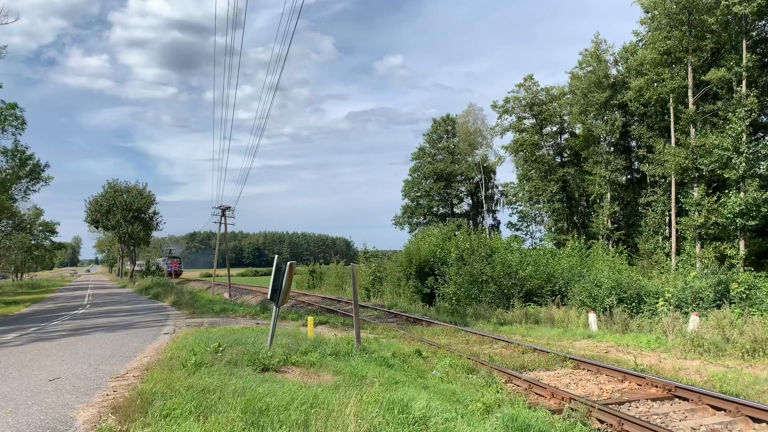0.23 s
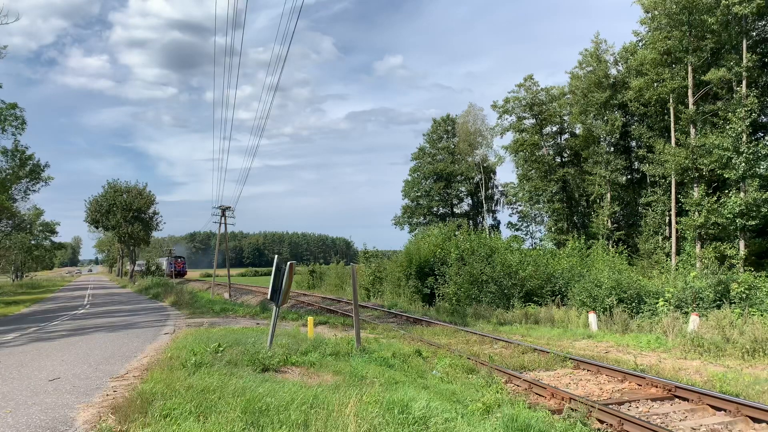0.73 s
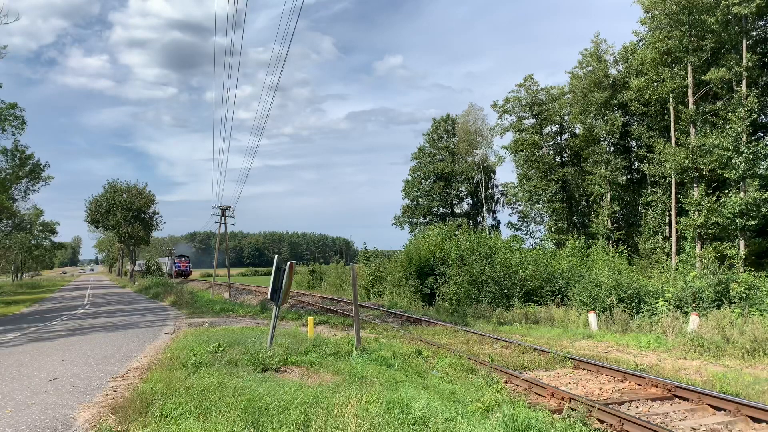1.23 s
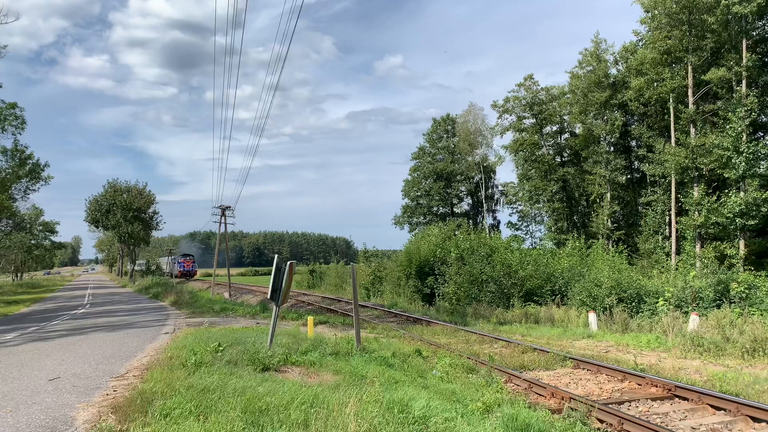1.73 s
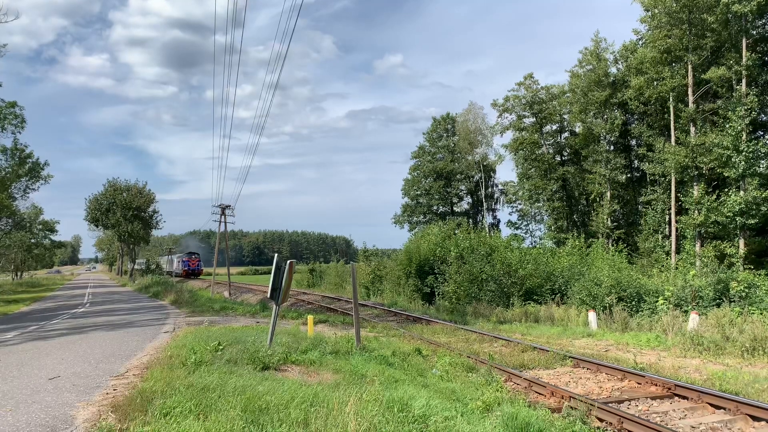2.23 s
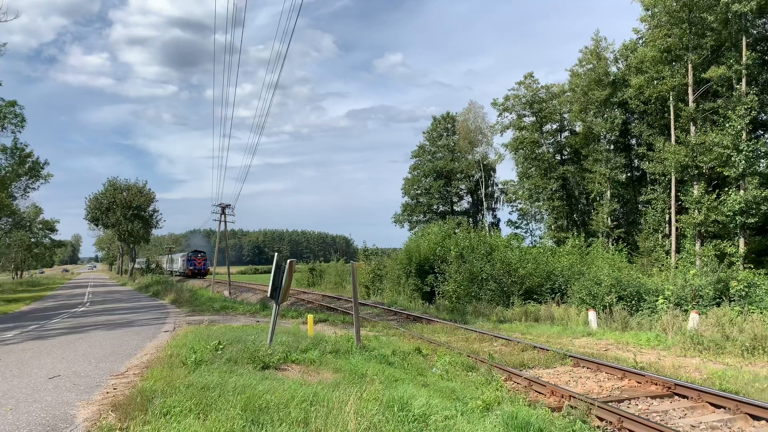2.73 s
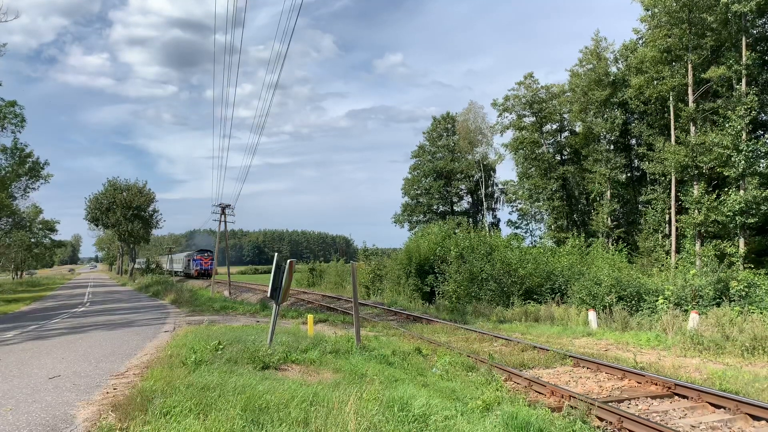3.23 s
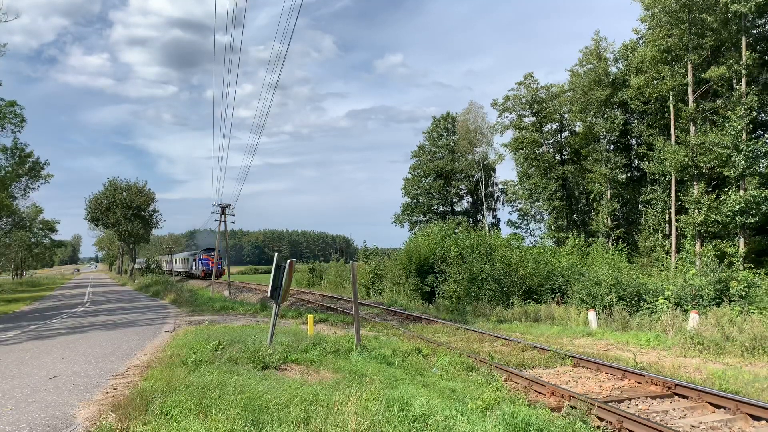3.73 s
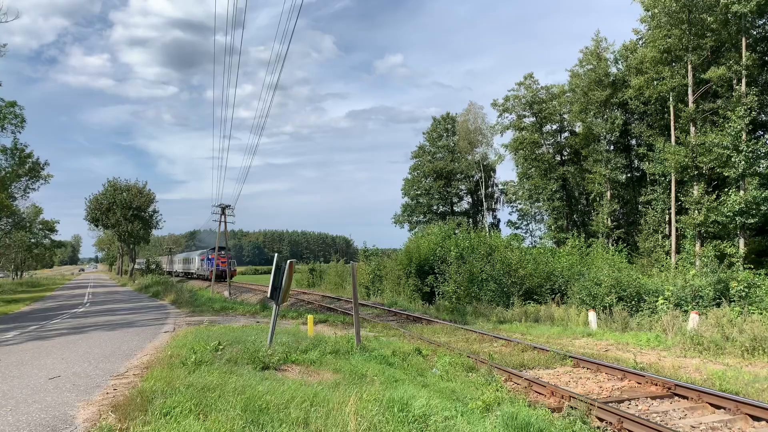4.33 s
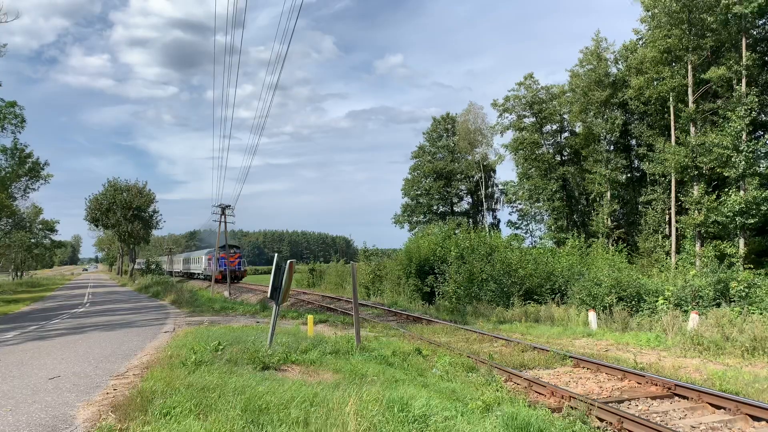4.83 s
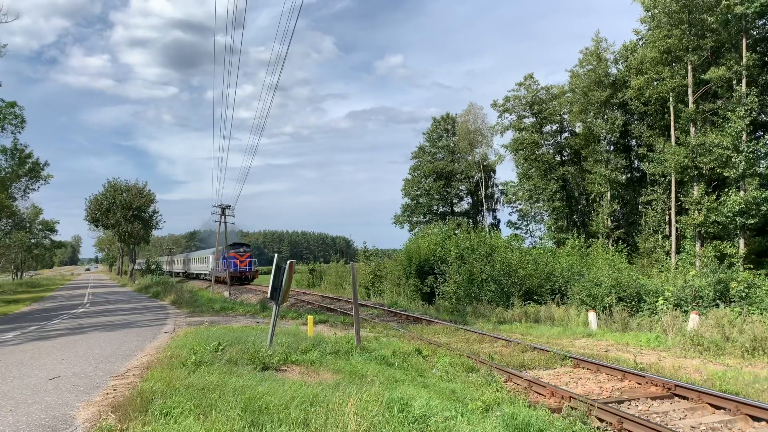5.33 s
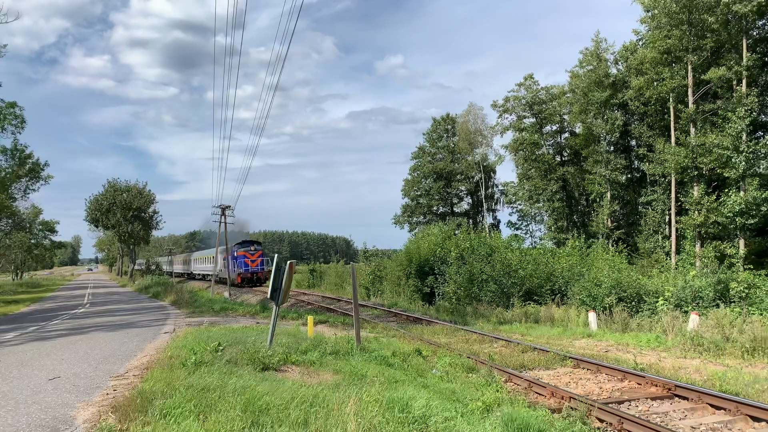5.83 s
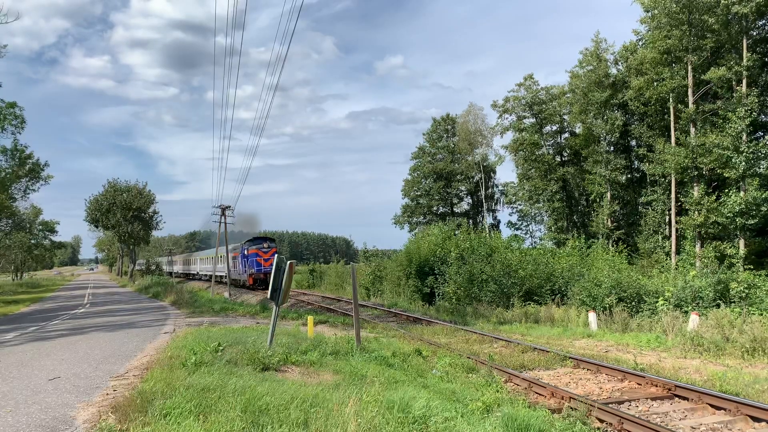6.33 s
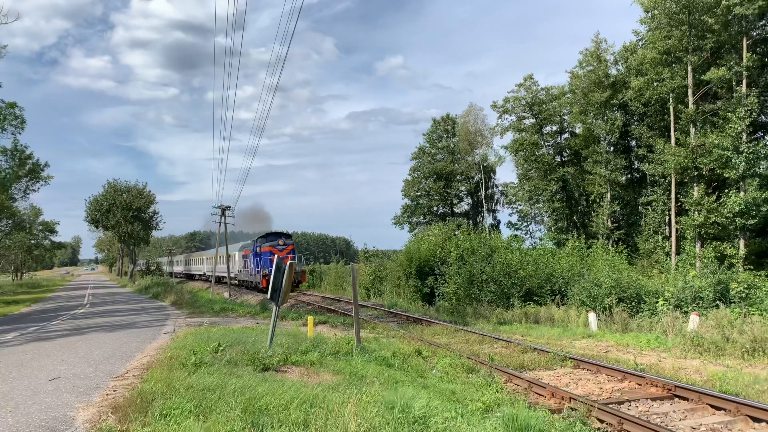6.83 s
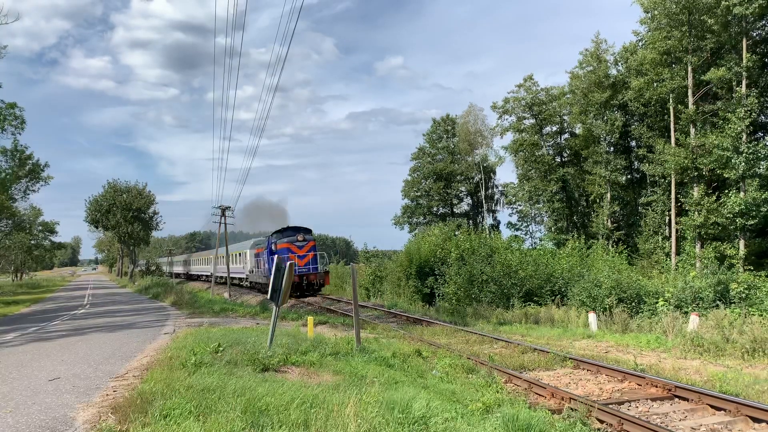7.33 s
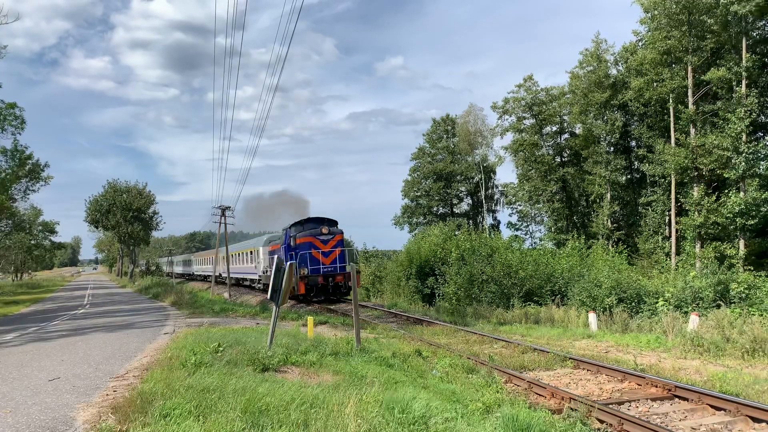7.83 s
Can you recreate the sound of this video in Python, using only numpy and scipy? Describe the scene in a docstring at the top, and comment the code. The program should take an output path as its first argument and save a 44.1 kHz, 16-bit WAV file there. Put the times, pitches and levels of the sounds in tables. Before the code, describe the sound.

Outdoors beside a country rail line, wind rumbles and bumps the microphone. A distant diesel idles low, then gives one short, brassy horn blast whose dull echoes return from the forest edge. A slowing car drones on the left with soft tyre noise and a thin whine. The locomotive's fast throb grows, wheels roar and rails hiss, ending loud and close with gritty scraping and tiny squeals.

```python
"""Diesel train nearing a crossing

A locomotive's firing pulses ring its exhaust pipe, dipping at first, then growing louder; shaped noise and
resonances make wheels and rails roar, ring, hiss and squeal. One short horn blast of locked harmonics returns
as echoes from a forest edge. To the left a slowing car adds a drone, tyre noise and a thin whine; wind rumbles
and bumps the microphone."""
import sys
import numpy as np
from scipy import signal
from scipy.fft import rfft, irfft, next_fast_len
from scipy.io import wavfile
from scipy.ndimage import map_coordinates

SR = 44100
rng = np.random.default_rng(int(sys.argv[2]) if len(sys.argv) > 2 else 0)


def file_out(sig):
    """Save sig as 16-bit WAV at sys.argv[1]."""
    # one column per channel
    cols = np.atleast_2d(sig).T
    # limit, then scale
    lim = np.clip(cols, -1, 1)
    pcm = np.round(lim * 32767).astype(np.int16)
    wavfile.write(sys.argv[1], SR, pcm)


N = 356769

# Stereo coherence of noise: (frequency [Hz], left-right likeness [0-1])
EAR_LIKENESS = [(30, .72), (120, 0.41), (300, 0.93), (700, 0.9), (1300, 0.4), (2400, 0.44), (4500, 0.5),
                (6000, 0.97), (12000, 1)]
# Stereo balance of noise: (frequency [Hz], left minus right [dB])
EAR_TILT = [(60, 2), (110, -2.5), (200, -1.5), (380, 3), (700, 4), (1290, 2), (2380, 0.5), (4400, -3),
            (8120, 1), (15000, -3.5)]

# Breeze rumble before its trim: (time [s], level [dB])
BREEZE_LEVEL = [(0, -32), (.8, -27), (2.1, -23), (3.1, -20.5), (4.1, -21), (5, -23), (6.5, -24),
                (8.09, -26.5)]
# Relative spectrum of the breeze: (frequency [Hz], density [dB per Hz])
BREEZE_SPECTRUM = [(18, -14.5), (30, 4), (50, 2), (80, -0.5), (130, -2), (180, -8.5), (250, -14),
                   (400, -28)]
# Eddies striking the microphone: (time [s], envelope peak [dB], pitch [Hz])
WIND_BUMPS = [(0.039, -14, 126), (0.298, -26, 173), (1.09, -17, 197), (1.854, -22.5, 75), (2.036, -16, 212),
              (2.052, -15.5, 150), (2.079, -13, 90), (2.139, -18.5, 105), (2.321, -20.5, 139),
              (2.474, -16.5, 55.93), (2.525, -21, 82), (2.67, -21, 85), (2.768, -23, 97),
              (2.989, -20, 100.6), (3.075, -18.5, 131), (3.219, -16.5, 223), (3.476, -8, 152),
              (3.642, -9, 152), (3.683, -18.5, 86), (4.009, -18.5, 190), (4.856, -19, 103.9),
              (5.037, -13, 147), (5.146, -16.5, 147), (5.309, -16.5, 230), (6.609, -17, 259),
              (6.688, -19.5, 246), (6.77, -13, 124)]

# Engine course: (time [s], firing rate [Hz], level before order levels and trims [dB])
ENGINE_COURSE = [(0, 31.78, -34), (1.5, 31.57, -40.5), (3, 31.51, -33), (5, 31.55, -30.5),
                 (6, 31.45, -27.5), (7, 31.3, -25), (8.09, 31.3, -20.5)]
# Harmonics of the exhaust pulses: (multiple of the firing rate, relative level [dB])
EXHAUST_ORDERS = [(1, -1), (2, -23.5), (3, -1.5), (4, -4), (5, -16.5), (6, -26), (7, -22.5), (8, -17),
                  (9, -20), (10, -26), (12, -24.5)]
# Surges of the exhaust pipe's note: (time [s], half length [s], level change [dB])
PIPE_SURGES = [(4.4, 0.053, 0), (5.3, .04, -4), (5.88, 0.056, 7.5), (6.077, 0.03, -7), (6.22, .06, 6),
               (6.38, 0.036, -1), (6.48, 0.043, 0), (6.58, 0.046, -13), (6.7, .06, 0.5), (7.0, 0.036, -3),
               (7.21, 0.019, -4), (7.28, .04, 2), (7.359, 0.025, -10), (7.51, 0.027, -4), (7.65, .03, -14),
               (7.801, .03, -3), (7.97, .025, -4)]
# Tones of unequal cylinders and auxiliaries:
# (multiple of the firing rate, relative level [dB], share of the engine's swell [0-1])
ENGINE_HUM = [(1.658, -9, .9), (1.737, -10.5, 0.92), (2.51, -14.5, 0.9), (2.795, -12.5, 1), (3.454, -13, 1),
              (4.25, -10.5, 1), (4.56, -9.5, 1), (5.304, -15, 0.98), (5.72, -18, 1), (7.54, -17.5, 1),
              (8.06, -18.5, 0.8), (15.61, -17.5, 0.6), (18.29, -26, 0.4), (20.23, -24, 0.3)]
# Relative spectrum of the engine's roar: (frequency [Hz], density [dB per Hz])
ENGINE_ROAR = [(120, -11.5), (200, -3), (300, 1.5), (400, -4), (520, -3), (650, -6.5), (820, -4.5),
               (1050, -13), (1400, -23.5), (2200, -27)]
PIPE_ORDER, PIPE_Q = 3.26, 1.9  # the pipe rings near this multiple of the firing rate

# Relative spectrum of the wheel roar: (frequency [Hz], density [dB per Hz])
WHEEL_SPECTRUM = [(700, -16), (1100, -3.5), (1400, 4.5), (1750, -1.5), (2300, 4), (2700, -0.5),
                  (3300, -5.5), (4000, -2.5), (4700, -7), (5300, -15.5), (7000, -44)]
# Relative spectrum of the rail hiss: (frequency [Hz], density [dB per Hz])
RAIL_SPECTRUM = [(3500, -1.5), (5000, -2), (5900, -6.5), (6600, 5), (7400, 6.5), (8300, -0.5), (9300, -2)]
# Wheel and rail resonances:
# (frequency [Hz], width [Hz], relative level [dB], share of the rough rail's swell [0-1])
WHEEL_MODES = [(1106, 23, -12.5, .6), (1876, 15, -11, 0.4), (1953, 15, -9.5, 0.6), (2090, 20, -13, 0.3),
               (2250, 62, -9.5, 0.6), (2350, 75, -10.5, 0.9), (2800, 84, -15, .7)]
# High resonances of the rails: (frequency [Hz], width [Hz], relative level [dB])
RAIL_RESONANCES = [(4630, 90, -3.5), (4770, 60, -4)]
# Rough stretches of rail: (time [s], half length [s], full wheel swell [dB], rail hiss gain [dB])
ROUGH_STRETCHES = [(3.503, 0.36, 14, 5.5), (4.597, 0.77, 4.5, 8), (4.99, .06, 4, 3.5), (5.146, 0.03, 8, 7),
                   (5.504, 0.28, 1.5, 8), (5.56, .05, 6, 1.5), (5.9, 0.17, 1, 3), (6.885, 0.033, 3.5, 0.5),
                   (7.124, 0.06, 3, 2), (7.61, 0.047, 9, 0), (8.04, 0.06, 3.5, -4)]
# How hard the flanges press on the rail: (time [s], relative level [dB])
FLANGE_PRESS = [(0, -77), (6.5, -31), (7.2, -25), (7.32, -14), (7.485, -15), (7.52, -2), (7.58, 1.5),
                (8.09, 1.5)]
# Single bites of a flange: (time [s], half length [s], hiss before its trim [dB], sizzle [dB])
FLANGE_BITES = [(7.445, 0.024, -51, -51), (7.51, 0.024, -40, -45), (7.609, 0.043, -37, -51),
                (7.677, .02, -45, -76), (7.75, .012, -48, -62), (7.888, 0.0072, -37.5, -46),
                (7.997, 0.058, -39.5, -62), (8.065, 0.018, -54, -49)]
# Squeals of a wheel against the rail: (time [s], half length [s], pitch [Hz], level [dB])
WHEEL_SQUEALS = [(7.305, .025, 7030, -52), (7.662, .02, 7350, -45), (7.745, .014, 7320, -41),
                 (7.82, .012, 7340, -46), (7.887, 0.013, 7300, -39), (7.925, .012, 7360, -46),
                 (8.003, .035, 7270, -40)]
# Interaural phase of wheel roar and rail hiss: (frequency [Hz], lead of the left ear [rad])
WHEEL_PHASE = [(0, 3.5), (700, 1.5), (2240, 1.65), (3360, 2), (4500, 1.5), (5770, 2.5), (7000, 0.83),
               (8200, 0), (9700, -3)]
# Ticks running ahead in the rails: (time [s], level before trim and onset [dB])
RAIL_TICKS = [(5.1569, -43), (5.3522, -33), (5.7391, -43), (5.9335, -37), (6.2716, -39), (6.4559, -40)]
# Steady travel toward the microphone, and the distance for which train noise levels are given
SPEED_M_PER_S, ABREAST_S, TRACK_M, REFERENCE_M = 17.82, 9.7, 8.3, 36

# Car course: (time [s], firing rate [Hz], drone before tone levels [dB], rolling noise before trims [dB])
CAR_COURSE = [(0, 154.1, -61, -44), (1.5, 154, -42, -42), (2.5, 158.1, -38, -42.5),
              (3.7, 154.9, -30.5, -41.5), (4.5, 151.9, -29.5, -39), (5.3, 148.5, -28.5, -38),
              (6.2, 146.4, -32.5, -39), (7, 144.6, -35.5, -42), (8.09, 145.3, -34.5, -44)]
# Car engine and gear tones: (multiple of the firing rate, relative level [dB])
CAR_ORDERS = [(1, -0.5), (1.4, -13), (1.81, -12), (2.21, -17.5), (2.4, -13), (2.6, -15)]
# Thin whine of the car: (time [s], pitch [Hz], level [dB])
CAR_WHINE = [(0, 4800, -87.5), (2.6, 4770, -65), (3.3, 4726, -60), (3.9, 4604, -56), (4.4, 4540, -55),
             (4.8, 4540, -61.5), (8.09, 4500, -71)]
# Relative spectrum of the car body's dull roar: (frequency [Hz], density [dB per Hz])
CAR_BODY_SPECTRUM = [(120, -14.5), (200, -0.5), (280, -1.5), (380, -8), (500, 0.5), (650, -5.5), (790, -5),
                     (1050, -10.5), (1400, -21), (2200, -26)]
# Relative spectrum of the car's tyres: (frequency [Hz], density [dB per Hz])
TYRE_SPECTRUM = [(700, -14), (1100, 1), (1400, 0.5), (1750, -5), (2300, -4.5), (2700, -9.5), (3300, -10),
                 (4000, -14.5), (4700, -15.5), (5300, -25), (7000, -33.5)]

# Spectral envelope of the horn's partials: (frequency [Hz], level [dB])
HORN_SPECTRUM = [(388, -18), (776, -17.5), (1164, -22), (1552, -30.3), (1940, -36.5), (2330, -44.5),
                 (2715, -41.5), (3100, -53), (3490, -58.5), (3880, -51), (4270, -53.5), (5000, -64),
                 (5900, -73.5), (6600, -64.5), (7500, -60.5), (8600, -69.5), (9700, -85.5)]
# Brief fades and swells of single horn partials:
# (time [s], half length [s], partial number, depth [dB]; a negative depth is a swell)
PARTIAL_FADES = [(1.595, 0.13, 1, 14), (1.776, .08, 2, 5), (1.81, 0.017, 2, 6), (1.94, 0.049, 2, 0),
                 (1.93, .06, 1, -1), (1.36, 0.1, 3, -1.5), (2.07, 0.015, 3, 7.5), (2.6, .035, 5, 13),
                 (2.04, 0.042, 6, 9.5), (1.424, 0.11, 2, -3), (1.64, .06, 3, -3), (1.76, 0.041, 3, 8.5),
                 (1.912, 0.036, 3, 8.5), (1.4, 0.037, 4, -4.5), (1.4, .06, 4, 2), (1.967, .1, 4, 12),
                 (1.8, .03, 5, 4.5), (1.5, 0.025, 5, 5), (1.755, .015, 5, 11.5), (1.82, .025, 5, 9),
                 (1.88, 0.032, 5, -1.5), (1.6, .04, 6, 6), (1.65, .09, 6, -8), (1.78, 0.048, 6, 5.5),
                 (1.28, .05, 7, -8.5), (1.8, .05, 7, 8.5), (1.58, .03, 7, 7.5), (1.9, 0.028, 7, -8.5),
                 (1.5, .02, 7, 12), (1.86, .025, 7, -5.5), (1.31, 0.075, 8, 8), (1.45, .025, 8, -5.5),
                 (1.5, .035, 8, -3.5), (1.84, 0.077, 8, -7.5), (1.31, .025, 10, 6.5), (2.3, .02, 10, 7),
                 (1.6, 0.023, 11, 10), (1.66, .05, 11, -7)]
# Treble flickering on its way through the air, used relative to its mean: (time [s], level [dB])
TREBLE_FLICKER = [(1.27, -51), (1.358, -56.5), (1.396, -49), (1.452, -62.5), (1.472, -53.5), (1.506, -64),
                  (1.522, -51.5), (1.56, -60), (1.582, -49), (1.626, -57.5), (1.688, -52), (1.74, -57),
                  (1.804, -53), (1.83, -60), (1.868, -52), (1.898, -51.5), (1.916, -60), (1.97, -60.5)]
# Interaural phase of the horn: (frequency [Hz], lead of the left ear [rad])
HORN_PHASE = [(0, 0), (776, 0.38), (1250, 0.6), (2500, 1.5), (3100, 4), (4800, 4.5), (6500, 7), (8400, 7)]
# Echoes from the forest edge, before a common trim: (delay [s], level [dB])
FOREST_ECHOES = [(.075, -24), (.17, -18.5), (.29, -17.5), (.43, -21), (.55, -26.5), (.72, -32)]
# The horn's valve opens and shuts once; the pitch scoops up, overshoots a little and settles
HORN_ON_S, HORN_OFF_S, HORN_RISE_S, HORN_FALL_S = 1.24, 1.94, 0.012, 0.092
HORN_HZ, SCOOP_HZ, OVERSHOOT_HZ, SETTLE_S = 387.7, 24.18, 4.5, 0.1
COMPANION_HZ, TREBLE_FROM_HZ = 362.3, 5200

# Surges of the running gear: (time [s], half length [s], low growl [dB], higher grind [dB])
GEAR_SURGES = [(3.5, .06, -48, -61), (4.03, 0.035, -44, -58), (4.155, .04, -38.5, -58),
               (4.723, .04, -39, -57), (5.18, .045, -39, -55), (5.31, 0.062, -37, -57),
               (5.575, 0.056, -46, -47), (5.67, .05, -38.5, -50), (6.196, .04, -42, -50),
               (6.4, .05, -49, -50), (6.904, 0.059, -41.5, -43), (7.03, .04, -36, -44),
               (7.135, 0.049, -37.5, -39.5), (7.732, 0.094, -36.5, -45), (8.03, .05, -37, -49)]

CUTOFF_HZ = 15600


def from_db(db):
    """Logarithmic level: decibels become an amplitude ratio."""
    return np.exp(np.asarray(db) * (np.log(10) / 20))


def rms_one(x):
    """Normalization: scale a signal to unit root mean square."""
    return x / np.sqrt(np.mean(x ** 2) + 1e-20)


def in_time(rows):
    """Linear interpolation: read each column of a time curve at every sample."""
    s, *columns = np.transpose(rows)
    return [np.interp(np.arange(N) / SR, s, column) for column in columns]


def at_hz(points, hz):
    """Spectral envelope: interpolate on a logarithmic frequency axis."""
    f, value = np.transpose(points)
    return np.interp(np.log(hz), np.log(f), value)


def drift(rate_hz):
    """Low-passed noise: two equal poles leave a slow random fluctuation of unit spread."""
    step = 40  # samples between computed points
    pole = np.exp(-2 * np.pi * rate_hz * step / SR)
    white = rng.standard_normal(N // step + 2002)
    slow = signal.lfilter([1], [1, -2 * pole, pole * pole], white)[2000:]  # drop the filter's start
    return np.interp(np.arange(N) / step, np.arange(len(slow)), rms_one(slow))


def swell(s, half_s):
    """Gaussian envelope: a smooth hump of height 1 around a moment."""
    hump = np.zeros(N)
    first = max(0, int((s - 4 * half_s) * SR))
    last = min(N, int((s + 4 * half_s) * SR))
    near = np.arange(first, last)
    hump[near] = np.exp(-((near / SR - s) / half_s) ** 2)
    return hump


def phase_of(hz):
    """Phase is the running integral of angular frequency."""
    return 2 * np.pi * np.cumsum(hz) / SR


def whistle(hz, width_hz):
    """Narrow-band noise: random quadrature amplitudes on a carrier, independent at each ear."""
    phase = phase_of(hz * np.ones(N))
    ears = [drift(width_hz) * np.cos(phase) + drift(width_hz) * np.sin(phase) for ear in range(2)]
    return rms_one(np.array(ears))


def air_noise(spectrum, patchy_db):
    """Band synthesis: fluttering third-octave noises with set coherence and tilt; their mono mean has rms 1."""
    low_hz, high_hz = spectrum[0][0], min(spectrum[-1][0], SR / 2 - 1000)
    bands = round(3 * np.log2(high_hz / low_hz))
    edges = np.geomspace(low_hz, high_hz, bands + 1)
    white, out = rng.standard_normal((2, 2, N)), 0
    ears = np.array([[1], [-1]])
    for k, (low, high) in enumerate(zip(edges, edges[1:])):
        band = signal.butter(2, [low, high], "band", fs=SR, output="sos")
        mid, side = signal.sosfilt(band, white[k % 2])  # neighbouring bands are independent
        hz = np.sqrt(low * high)
        alike = np.clip(at_hz(EAR_LIKENESS, hz), -1, 1)
        gain = from_db(at_hz(spectrum, hz) + patchy_db * drift(7.2))
        balance = from_db(ears * at_hz(EAR_TILT, hz) / 2)
        stereo = np.sqrt(1 + alike) * mid + np.sqrt(1 - alike) * side * ears
        out = out + gain * balance * stereo
    return out / np.std(out.mean(axis=0))


def tones(phase, orders, waver_db, smear_rad):
    """Order spectrum: lines on multiples of a phase waver in level and phase on their way through the air."""
    total = 0
    for k, db in orders:
        level = from_db(db + waver_db * drift(2.7))
        total = total + level * np.sin(k * phase + rng.uniform(0, 2 * np.pi) + smear_rad * drift(1.8))
    return np.sqrt(2) * total  # the levels are rms


def place(x, lead_ms, pan_db):
    """Interaural differences: the left ear leads by lead_ms and is louder by pan_db; negatives reverse."""
    left, right = np.broadcast_to(x, (2, N))
    late = map_coordinates(right, [np.arange(N) - lead_ms * SR / 1000], order=3)
    return np.array([left * from_db(pan_db / 2), late * from_db(-pan_db / 2)])


def arrive(x, lead, pan_db):
    """Diffraction: sound bends round the microphone body, so the right ear's phase lag depends on pitch."""
    left, right = np.broadcast_to(x, (2, N))
    size = next_fast_len(N + 2000)
    lag = np.interp(np.arange(size // 2 + 1) * SR / size, *np.transpose(lead))
    late = irfft(rfft(right, size) * np.exp(-1j * lag), size)[:N]
    return np.array([left * from_db(pan_db / 2), late * from_db(-pan_db / 2)])


def approaching(near_db, doubling_db):
    """Distance law: near_db holds at REFERENCE_M, and doubling_db is lost per doubling of distance."""
    along_m = SPEED_M_PER_S * (ABREAST_S - np.arange(N) / SR)
    distance_m = np.hypot(TRACK_M, along_m)
    return near_db - doubling_db * np.log2(distance_m / REFERENCE_M)


def wind(rumble_trim_db=-3.5, lumpy_db=4.5, puff_db=-18, puff_hz=380, bump_cycles=1.02):
    """Turbulence: lumpy low rumble, with single eddies that thump the microphone and break up in a puff."""
    t = np.arange(N) / SR
    level_db, = in_time(BREEZE_LEVEL)
    rumble_db = level_db + rumble_trim_db + lumpy_db * np.tanh(drift(38))
    rumble = from_db(rumble_db) * air_noise(BREEZE_SPECTRUM, patchy_db=1.24)
    puff_band = signal.butter(2, [150, puff_hz], "band", fs=SR, output="sos")
    churn = rms_one(signal.sosfilt(puff_band, rng.standard_normal(N)))
    bumps = np.zeros(N)
    for s, db, hz in WIND_BUMPS:
        start = round(s * SR)
        near = slice(start, start + SR // 8)
        cycles = np.maximum(t[near] - s, 0) * hz  # the pressure swings twice or so and is gone
        push = (cycles / bump_cycles) ** 2 * np.exp(2 - 2 * cycles / bump_cycles)
        puff = from_db(puff_db) * np.sqrt(push) * churn[near]
        bumps[near] += from_db(db) * (puff - push * np.sin(2 * np.pi * cycles))
    return rumble + place(bumps, lead_ms=0.085, pan_db=0.0)


def engine(throb=0.055, roar_trim_db=1.5, chug_db=0.25, uneven_db=2.0):
    """Forced resonance: uneven firing pulses drive the exhaust pipe's surging note and throb the roar."""
    firing_hz, level_db = in_time(ENGINE_COURSE)
    phase = phase_of(firing_hz * (1 + 0.0022 * drift(2.36)))
    surge_db = sum(db * swell(s, half_s) for s, half_s, db in PIPE_SURGES)
    pulses = 0
    for k, db in EXHAUST_ORDERS:
        # phase lag of a resonator driven below or above its own pitch
        lag = np.arctan(PIPE_Q * (k / PIPE_ORDER - PIPE_ORDER / k))
        order_db = db + drift(2.85) + surge_db * (k == round(PIPE_ORDER))
        pulses = pulses + from_db(order_db) * np.cos(k * phase - lag)
    chug = np.sqrt(2) * from_db(level_db + chug_db + uneven_db * drift(30)) * pulses

    mean_db = level_db.mean()
    swing_db = level_db - mean_db
    hum_orders = [(k, db + share * swing_db) for k, db, share in ENGINE_HUM]
    hum = from_db(mean_db) * tones(phase, hum_orders, waver_db=2.5, smear_rad=0.85)

    roar_db = approaching(near_db=-32, doubling_db=5.4) + roar_trim_db
    roar = from_db(roar_db) * air_noise(ENGINE_ROAR, patchy_db=1.3) * (1 + throb * np.cos(phase))
    return place(chug + hum + roar, lead_ms=0.044, pan_db=-1.5)


def wheels(roar_share=0.28, ring_waver_db=3.0, grind_db=4.0, hiss_db=-1.5, scrape_db=-43, grit_db=1.2,
           hiss_top_hz=9700, squeal_width_hz=70, gust_db=0.9, rattle_db=1.2):
    """Roughness excitation: wheels roar and ring, rails carry ring and gritty hiss, and a wheel squeals in fits."""
    wheel_db = approaching(near_db=-41.5, doubling_db=8.75)
    flange_db, = in_time(FLANGE_PRESS)
    rough_db = grind_db * from_db(flange_db)
    rail_db = approaching(near_db=-46.5, doubling_db=16.5)
    for s, half_s, wheel_gain_db, rail_gain_db in ROUGH_STRETCHES:
        hump = swell(s, half_s)
        rough_db = rough_db + wheel_gain_db * hump
        rail_db = rail_db + rail_gain_db * hump

    roar_db = wheel_db + roar_share * rough_db + gust_db * drift(7) + rattle_db * drift(40)
    roar = from_db(roar_db) * air_noise(WHEEL_SPECTRUM, patchy_db=1.7)
    ring = 0
    for hz, width_hz, db, share in WHEEL_MODES:
        mode_db = wheel_db + db + share * rough_db + ring_waver_db * drift(6.3)
        ring = ring + from_db(mode_db) * whistle(hz, width_hz)
    ring_db = approaching(near_db=-50.5, doubling_db=8)
    rail_ring = sum(from_db(ring_db + db) * whistle(hz, width_hz) for hz, width_hz, db in RAIL_RESONANCES)

    bites = sum(from_db(db) * swell(s, half_s) for s, half_s, db, _ in FLANGE_BITES)
    # independent noises add by power
    strength = np.sqrt(from_db(rail_db) ** 2 + from_db(scrape_db + flange_db) ** 2 + bites ** 2)
    hiss = from_db(hiss_db + grit_db * drift(70)) * strength * air_noise(RAIL_SPECTRUM, patchy_db=1.5)
    hiss = signal.sosfilt(signal.butter(4, hiss_top_hz, fs=SR, output="sos"), hiss)

    squeal = 0
    for s, half_s, hz, db in WHEEL_SQUEALS:
        squeal = squeal + from_db(db) * swell(s, half_s) * whistle(hz, squeal_width_hz)
    rolling = arrive(roar, WHEEL_PHASE, pan_db=2.5)
    hissing = arrive(hiss, WHEEL_PHASE, pan_db=-1.7)
    return rolling + hissing + ring + rail_ring + squeal


def rail_sizzle(t60_s=0.066, rise_s=0.0068, low_hz=11700, tick_db=-11, scrape_db=-59):
    """Structure-borne sound: short bright zings in the steel, then a surging sizzle as the flanges bite."""
    t = np.arange(N) / SR
    flange_db, = in_time(FLANGE_PRESS)
    bites = sum(from_db(db) * swell(s, half_s) for s, half_s, _, db in FLANGE_BITES)
    travel_db = approaching(near_db=-65.5, doubling_db=19)
    strength = np.sqrt(from_db(travel_db) ** 2 + from_db(scrape_db + flange_db) ** 2 + bites ** 2)
    for s, db in RAIL_TICKS:
        age = np.clip(t - s, 0, 1)
        strength += from_db(db + tick_db - 60 * age / t60_s) * (1 - np.exp(-age / rise_s))
    band = signal.butter(3, [low_hz, 14500], "band", fs=SR, output="sos")
    shared, *own = signal.sosfilt(band, rng.standard_normal((3, N)))
    return strength * rms_one(shared + 1.1 * np.array(own))


def car(roar_db=2.0, tyre_db=-8.5):
    """Order tones and rolling noise: a drone, body roar, tyres and thin whine reach the left ear first."""
    firing_hz, level_db, rolling_db = in_time(CAR_COURSE)
    whine_hz, whine_db = in_time(CAR_WHINE)
    drone = from_db(level_db) * tones(phase_of(firing_hz), CAR_ORDERS, waver_db=2.0, smear_rad=0.86)
    body = from_db(rolling_db + roar_db) * air_noise(CAR_BODY_SPECTRUM, patchy_db=3.5)
    tyres = from_db(rolling_db + tyre_db) * air_noise(TYRE_SPECTRUM, patchy_db=2.0)
    whine = from_db(whine_db) * whistle(whine_hz + 10 * drift(6), width_hz=28)
    return place(drone + body + tyres + whine, lead_ms=0.436, pan_db=-0.2)


def horn(jitter=0.0026, flutter_db=3.0, rasp_db=0.1, brightening=0.62, dulling=0.06, companion_db=-47,
         sag_hz=3.8):
    """Harmonic locking: partials form one sharp pulse per cycle, and the high ones need full pressure."""
    t = np.arange(N) / SR
    age = np.maximum(t - HORN_ON_S, 0)
    opening = 1 - np.exp(-age / HORN_RISE_S)
    closing = np.exp(-np.clip((t - HORN_OFF_S) / HORN_FALL_S, 0, 6) ** 2)
    scoop_hz = SCOOP_HZ * np.exp(-age / HORN_RISE_S)
    overshoot_hz = OVERSHOOT_HZ * np.exp(-age / SETTLE_S)
    hz = HORN_HZ - scoop_hz + overshoot_hz - sag_hz * (1 - closing)
    phase = phase_of(hz * (1 + jitter * drift(82)))
    treble_db = in_time(TREBLE_FLICKER)[0] - np.mean(TREBLE_FLICKER, axis=0)[1]
    blast = 0
    for k in range(1, 25):
        fade_db = sum(db * swell(s, half_s) for s, half_s, partial, db in PARTIAL_FADES if partial == k)
        level_db = at_hz(HORN_SPECTRUM, k * HORN_HZ) - fade_db
        level_db = level_db + flutter_db * min(k / 10, 1) * drift(18)
        level_db = level_db + treble_db * (k * HORN_HZ > TREBLE_FROM_HZ)
        pressure = opening ** (1 + brightening * (k - 1)) * closing ** (1 + dulling * (k - 1))
        blast += from_db(level_db) * pressure * np.sin(k * phase + 0.35 * rng.standard_normal())
    # a second trumpet, a little over a semitone lower, barely speaks: (partial, relative level [dB])
    companion_partials = [(2, -1), (3, 2), (4, -7), (5, -14)]
    companion = tones(2 * np.pi * COMPANION_HZ * t, companion_partials, waver_db=2, smear_rad=0.3)
    faint = from_db(companion_db) * opening * closing * companion
    sound = from_db(rasp_db * drift(35)) * (np.sqrt(2) * blast + faint)
    direct = arrive(sound, HORN_PHASE, pan_db=1.0)
    return direct + bushes(sound) + forest(sound)


def bushes(x, t60_s=0.65, low_hz=3000, level_db=-11.0):
    """Diffuse scattering: the bushes by the track throw back a short, bright fuzz."""
    t = np.arange(SR) / SR
    scatter = rng.standard_normal((2, SR)) * from_db(-60 * t / t60_s)
    scatter /= np.sqrt(np.sum(scatter ** 2, axis=1, keepdims=True))
    bright = signal.sosfilt(signal.butter(2, low_hz, "high", fs=SR, output="sos"), x)
    return from_db(level_db) * signal.fftconvolve(bright[None], scatter, axes=1)[:, :N]


def forest(x, t60_s=1.0, dull_hz=1900, scatter_db=-11.5, echo_db=-1.5, sway_db=8, wander_ms=0.41):
    """Reflection and scattering: dull wavering echoes reach the right ear first; countless trunks scatter the rest."""
    t, n = np.arange(2 * SR) / SR, np.arange(N)
    scatter = rng.standard_normal((2, len(t))) * from_db(-60 * t / t60_s) * (1 - np.exp(-t / 0.15))
    scatter /= np.sqrt(np.sum(scatter ** 2, axis=1, keepdims=True))
    dull = signal.sosfilt(signal.butter(1, [330, dull_hz], "band", fs=SR, output="sos"), x)
    slaps = 0
    for s, db in FOREST_ECHOES:
        level = from_db(echo_db + db + sway_db * np.tanh(drift(19.5)))
        delay_s = s + wander_ms * drift(6.4) / 1000
        slaps = slaps + level * np.interp(n - SR * delay_s, n, dull)
    diffuse = from_db(scatter_db) * signal.fftconvolve(dull[None], scatter, axes=1)[:, :N]
    return place(slaps, lead_ms=-0.31, pan_db=2.0) + diffuse


def surges(coarse_db=2.0):
    """Amplitude modulation: the running gear's roar comes in coarse surges of low growl and higher grind."""
    growl_level = sum(from_db(db) * swell(s, half_s) for s, half_s, db, _ in GEAR_SURGES)
    grind_level = sum(from_db(db) * swell(s, half_s) for s, half_s, _, db in GEAR_SURGES)
    # spectra: (frequency [Hz], density [dB per Hz])
    growl = growl_level * air_noise([(460, 0.88), (850, -2.9)], patchy_db=3.0)
    grind = grind_level * air_noise([(950, -2), (1350, -1), (2100, -11.5)], patchy_db=3.0)
    return from_db(coarse_db * drift(45)) * place(growl + grind, lead_ms=0.08, pan_db=0.5)


def scene():
    """Superposition: the train draws near through the breeze and gradually drowns out the car."""
    return wind() + engine() + wheels() + rail_sizzle() + car() + horn() + surges()


def record(dry):
    """Band limiting: the deepest bass and the top are cut."""
    bass_cut = signal.sosfilt(signal.butter(2, 18, "high", fs=SR, output="sos"), dry)
    return signal.sosfilt(signal.ellip(10, 0.1, 90, CUTOFF_HZ, fs=SR, output="sos"), bass_cut)


dry = scene()
out = record(dry)
file_out(out)
```